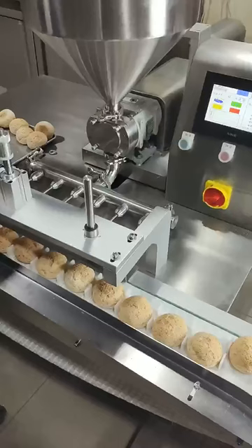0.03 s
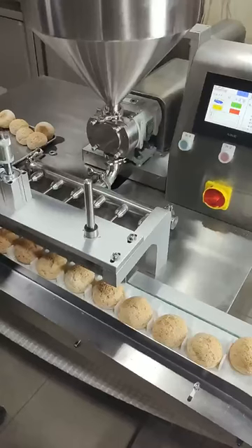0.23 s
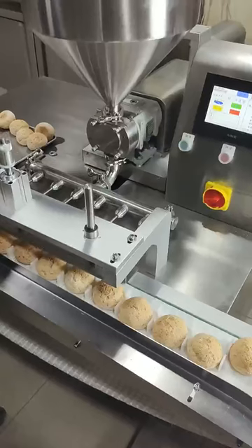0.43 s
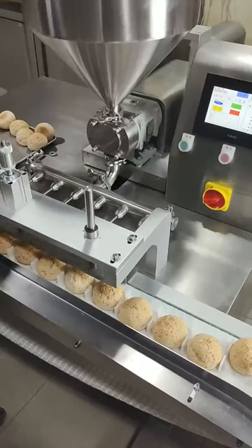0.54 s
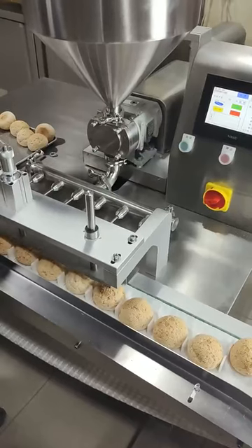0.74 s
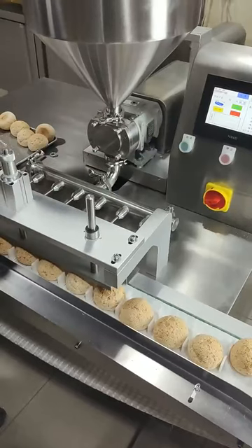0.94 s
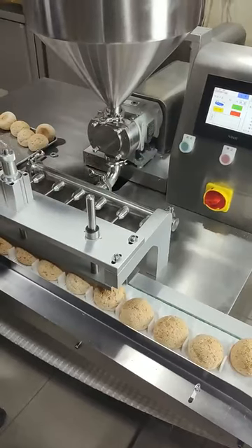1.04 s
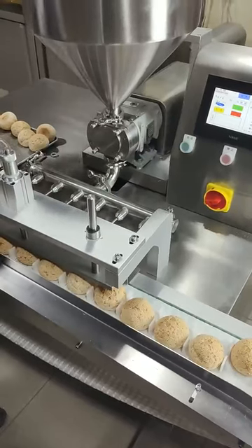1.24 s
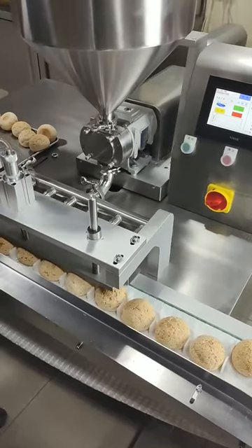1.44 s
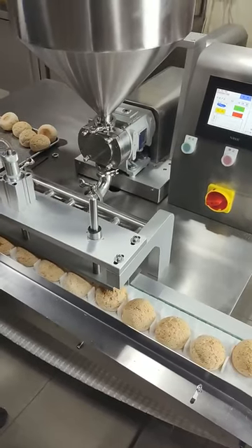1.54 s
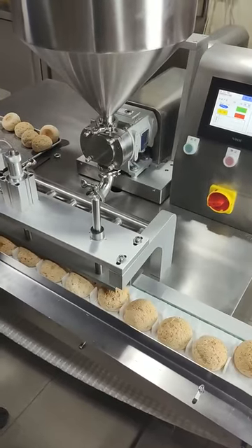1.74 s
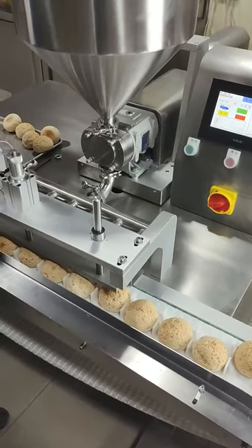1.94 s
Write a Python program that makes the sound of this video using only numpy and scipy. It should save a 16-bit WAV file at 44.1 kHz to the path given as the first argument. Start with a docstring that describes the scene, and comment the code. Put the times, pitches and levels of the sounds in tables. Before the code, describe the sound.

Close pneumatic filling machine in a hard-walled kitchen: a soft air puff and piston thump, a rattling steel clack, a lighter clack, then a heavy thump with a strong air blast fading out, over whine and hum.

```python
"""Pneumatic filling machine, close by

A filling machine runs one cycle in a hard-walled kitchen. A drive whines at one high pitch and the conveyor
motor hums in swells, both made from sine waves, over low machine noise made from filtered noise. Air vents in
shaped bursts of noise. A valve thumps open, and pistons thump into their cushions with a short low push and a
boom. Steel stops clack with ringing noise, the frame and loose parts rattle on, and the slide squeaks faintly."""
import sys
import numpy as np
from scipy import signal
from scipy.fft import rfft, irfft, next_fast_len
from scipy.io import wavfile
from scipy.ndimage import map_coordinates

SR = 44100
rng = np.random.default_rng(int(sys.argv[2]) if len(sys.argv) > 2 else 0)


def to_wav(sig):
    """Store sig (one row per channel, or 1-D mono) as 16-bit WAV at the path in sys.argv[1].

    Samples outside -1..1 are clipped; the rate is SR.
    """
    pcm = np.clip(np.atleast_2d(sig), -1, 1) * 32767
    pcm = np.round(pcm).astype(np.int16)
    wavfile.write(sys.argv[1], SR, pcm.T)  # frames by channels


N = 88200  # two seconds of samples

# Steel stops being hit. Each row: start in seconds, level in dB, time to fall by 60 dB in seconds,
# rattle level in dB, rattle hold in seconds, rattle release in dB per second, left minus right in dB.
CLACK_EVENTS = [(0.6492, -33, 0.049, -42.5, 0.078, 126, -1.5), (1.0402, -33, 0.027, -46, 0.029, 115, -4)]
# What each stop rings with, one list per stop. Each row: pitch in Hz, width in Hz, strength in dB.
STOP_RESONANCES = [
    [(610, 590, -3.5), (1176, 220, 7.5), (1290, 110, 11.5), (2500, 360, -16.5), (3170, 180, 2),
     (4570, 1900, -11.5), (6630, 980, -17), (9330, 860, -10)],
    [(1030, 660, -5), (2380, 470, 5.5), (4100, 150, -6), (4600, 300, -2), (5000, 130, -11),
     (6540, 220, 3.5), (9700, 1300, -22)],
]

BASS_HZ = 420  # below about this, bursts fade at their own speed and the ripple weakens


def amp(db):
    """Turn decibels into a gain."""
    return 10 ** (np.asarray(db) / 20)


def unit(x):
    """Scale x to an rms (average strength) of 1."""
    return x / np.sqrt(np.mean(x ** 2) + 1e-20)


def clock():
    """Time in seconds at each sample."""
    return np.arange(N) / SR


def curve(rows):
    """Join (seconds, value) points by straight lines, one value per sample."""
    return np.interp(clock(), *np.transpose(rows))


def along(points, hz):
    """Read a value at hz from (Hz, value) points joined on a logarithmic pitch axis."""
    point_hz, values = np.transpose(points)
    return np.interp(np.log(hz + 1), np.log(point_hz + 1), values)


def wobble(rate):
    """A smooth random curve with `rate` random points a second."""
    knots = rng.standard_normal(int(N * rate / SR) + 4)
    return map_coordinates(knots, [clock() * rate])


def panned(db):
    """Left and right gains for a level difference of left minus right."""
    left = np.atleast_1d(db)
    return amp(np.array([left, -left]) / 2)


def filtered(x, response):
    """Multiply the spectrum of x by a response that depends on frequency."""
    size = next_fast_len(N + SR // 4)  # spare room so that the end does not wrap onto the start
    hz = np.fft.rfftfreq(size, 1 / SR)
    return irfft(rfft(x, size) * response(hz), size)[..., :N]


def ringing(modes, hz):
    """Gain of a set of resonances: their powers add up, each peaking at its own pitch."""
    power = sum(amp(db) ** 2 / (1 + (2 * (hz - centre) / width) ** 2) ** 2 for centre, width, db in modes)
    return np.sqrt(power)


def ripple(hz):
    """Fine peaks and dips from standing waves between steel panels, different in each ear above the bass."""
    spacing_hz = 44.64
    knots = rng.standard_normal((2, SR // 16))
    peaks = np.array([map_coordinates(k, [hz / spacing_hz], mode="wrap") for k in knots])
    return peaks * hz / (hz + BASS_HZ)


def rush(gain, ripple_db=4.5):
    """Stereo noise of rms 1: bass alike in both ears, treble more diffuse and mostly to the right."""
    # Each row: frequency in Hz, likeness of left and right (1 is identical).
    likeness = [(80, 0.99), (180, 0.99), (350, 0.76), (700, 0.57), (1400, 0), (3000, 0.0052), (12000, 0.36)]
    # Each row: frequency in Hz, left minus right in dB.
    ear_balance = [(100, .3), (350, 0), (700, -1), (1400, 1), (2800, 0), (5600, -8.5), (9000, -0.5),
                   (13000, -14)]

    def middle_and_side(hz):
        angle = np.arccos(np.clip(along(likeness, hz), -1, 1)) / 2
        return gain(hz) * [np.cos(angle), np.sin(angle)]

    def ears(hz):
        return panned(along(ear_balance, hz)) * amp(ripple_db * ripple(hz))

    mid, side = filtered(rng.standard_normal((2, N)), middle_and_side)
    return unit(filtered(np.array([mid + side, mid - side]), ears))


def burst(noise, start, rise, hold, sag, dulling, release, lead=0):
    """Noise rises, changes level and tone, then fades; treble may stop sooner, bass has its own speed."""
    sag_pivot_hz, treble_hz = 1000, 6000  # dulling counts octaves from the first, lead from the second
    bass_release = 96  # dB per second
    rise_shape = 0.62  # below 1: a valve opens quickly at first
    hz, t, z = signal.stft(noise, SR, nperseg=512)
    hz = hz[:, None]
    age = np.maximum(t - start, 0)
    slope = sag + dulling * np.log2(np.maximum(hz, BASS_HZ) / sag_pivot_hz)
    fall = release + (bass_release - release) / (1 + (hz / BASS_HZ) ** 4)
    held = np.maximum(hold - lead * np.log2(1 + (hz / treble_hz) ** 4) / 4, 0)
    gain = amp(-slope * age - fall * np.maximum(age - held, 0))
    shaped = signal.istft(z * gain, nperseg=512)[1][:, :N]
    return shaped * np.clip((clock() - start) / rise, 0, 1) ** rise_shape


def strike(t, rise, t60):
    """Loudness of a blow at t = 0: a quick rise in seconds, while it falls 60 dB in t60 seconds."""
    return np.clip(t / rise, 0, 1) * amp(-60 * np.abs(t) / t60)


def machine_noise():
    """The frame's rumble swells and sinks over the noise of the kitchen, both as coloured noise."""
    # Tone of the frame and of the kitchen. Each row: frequency in Hz, strength in dB per Hz.
    rumble_colour = [(40, 7), (70, -4.5), (95, -5.5), (125, -8.5), (170, 4.5), (245, 2), (350, 0),
                     (480, -15.5), (1200, -97)]
    floor_colour = [(40, -52), (80, -2), (240, 5.5), (450, -9.5), (800, -16.5), (1500, -9.5), (2500, -15),
                    (4500, -12), (7500, -21), (11000, -42.5), (15500, -24)]
    # Loudness of each over time. Each row: time in seconds, level in dB.
    rumble_level = [(.2, -66), (.36, -60), (.5, -50.5), (.62, -64.5), (.7, -54), (.82, -54), (.98, -69.5),
                    (1.09, -60.5), (1.25, -53), (1.55, -48), (1.8, -65), (1.95, -82)]
    floor_level = [(.15, -73), (.5, -63.5), (.9, -61.5), (1, -62), (1.7, -64), (1.95, -68.5)]
    rumble = amp(curve(rumble_level)) * rush(lambda hz: amp(along(rumble_colour, hz)))
    kitchen = amp(curve(floor_level)) * rush(lambda hz: amp(along(floor_colour, hz)))
    return rumble + kitchen


def drives():
    """The drive's switching whine and the conveyor motor's hum: two sine waves that waver a little."""
    # Loudness of whine and hum. Each row: time in seconds, level in dB.
    whine_level = [(.15, -80), (.25, -60), (.42, -53.3), (.62, -53.8), (.8, -56.8), (1.03, -60.3),
                   (1.3, -62), (1.45, -68), (1.73, -69), (1.8, -79), (2, -86)]
    hum_level = [(.3, -85), (.38, -59), (.43, -94), (.5, -60), (.63, -64.5), (.76, -59), (.88, -57.5),
                 (.96, -80), (1.05, -68), (1.12, -109)]
    whine_hz, motor_hz = 9000, 86
    t = clock()
    whine = amp(curve(whine_level) + 1.2 * wobble(40.1)) * np.sin(2 * np.pi * whine_hz * t)
    hum_phase = 2 * np.pi * motor_hz * t + 0.1 * wobble(11)
    hum = amp(curve(hum_level) + 0.4 * wobble(17.6)) * np.sin(hum_phase)
    # The whine sits well to the right; the root of 2 brings a sine wave to rms 1.
    return np.sqrt(2) * (panned(-14) * whine + hum)


def exhausts():
    """Air rushes out and its tone shifts as it flows; the port's resonances fade a little more slowly."""
    # Each row: start in seconds, rise in seconds, hold in seconds, level in dB, sag in dB per second,
    # extra sag in dB per second per octave, release in dB per second, how much sooner treble stops
    # in seconds per octave. A negative sag grows louder.
    vents = [(0.155, 0.092, 0.22, -40.5, -8.5, 11.5, 122, 0.19),
             (1.139, 0.019, 0.21, -34.5, 20, 7, 48, 0.15), (1.197, 0.36, 0.55, -41, 18.5, -5, 175, 0.055)]
    # Tone of each exhaust's air. Each row: frequency in Hz, strength in dB per Hz.
    puff_colour = [(35, -53), (60, -17), (242, 5), (343, -2.5), (413, -10), (585, -3.5), (1320, -4.5),
                   (1420, -4.5), (2530, -6), (3840, -5.5), (7540, -8), (9300, 3.5), (10200, -7),
                   (11500, -25), (15500, -13.5)]
    blast_colour = [(35, -36), (60, -5), (149, -16), (179, -7), (215, -3), (413, -8), (572, -7.5),
                    (627, -5.5), (792, -5), (1230, -11.5), (2710, -8), (4850, -14.5), (9080, -10),
                    (11200, -17.5), (15500, -21.5)]
    bleed_colour = [(35, -48), (60, -11.5), (291, 0), (475, -7.5), (756, -3), (1170, -11), (1670, -3.5),
                    (2250, -8.5), (3760, -8), (4320, -9.5), (4740, -9), (5840, -11), (9300, -21),
                    (10900, -38.5), (15500, -32)]
    # Resonances of each exhaust port. Each row: pitch in Hz, width in Hz, strength in dB.
    puff_port = [(350, 25, 2), (580, 50, -2), (690, 40, 3), (760, 50, 2), (1430, 40, -1), (1590, 50, -2),
                 (1750, 35, 3), (2110, 40, -2), (2200, 40, 1), (2360, 50, -1), (2780, 60, 5), (2965, 50, 3),
                 (3130, 45, 0), (3460, 70, 4), (3650, 70, 1), (3935, 50, 2), (4330, 60, 2), (5200, 70, 0),
                 (7190, 70, -1), (8100, 150, -2)]
    blast_port = [(245, 25, -3), (560, 50, -1), (728, 25, 5), (805, 30, 0), (882, 30, 1), (1642, 70, 1),
                  (2762, 40, 1), (3182, 50, 2), (3905, 55, 5), (4390, 60, 2), (5540, 50, 1), (5890, 110, 4),
                  (6346, 40, 1), (6940, 70, 0), (9350, 120, -1), (10475, 70, 0)]
    bleed_port = [(245, 50, -1), (680, 60, -1), (1355, 60, -2), (1540, 50, -2), (1660, 100, 2),
                  (2440, 130, -3), (2865, 80, 3), (3360, 70, -2), (4280, 120, 0), (4440, 130, 3),
                  (5230, 60, -1), (5350, 50, -1), (5550, 100, 2), (5920, 50, 0), (6065, 50, 0),
                  (6340, 50, -2)]
    # One value per exhaust: level of the resonances over the rush in dB.
    port_levels = [-4.5, -6, -1.5]
    colours = (puff_colour, blast_colour, bleed_colour)
    ports = (puff_port, blast_port, bleed_port)
    out = 0
    for vent, colour, port, port_db in zip(vents, colours, ports, port_levels):
        start, rise, hold, db, sag, dulling, release, lead = vent
        air = rush(lambda hz: amp(along(colour, hz)))
        ring = rush(lambda hz: amp(along(colour, hz)) * ringing(port, hz), ripple_db=1.5)
        out = out + amp(db) * burst(air, start, rise, hold, sag, dulling, release, lead)
        out = out + amp(db + port_db) * burst(ring, start, rise, hold, sag, dulling, release * 0.8, lead)
    return out


def thumps():
    """A valve opens with a thump, then pistons meet their cushions: each a low push, and the room booms."""
    # Each row: time in seconds, level in dB, pitch of the push in Hz, its length (bell width) in seconds. # The
    # first row is the valve opening; the others are pistons meeting their cushions.
    thump_hits = [(.1605, -48.5, 250, .0018), (0.337, -29, 268, 0.00062), (0.3595, -44, 227, 0.00084),
                  (0.41, -59, 260, 0.0012), (.8278, -49, 170, 0.0018), (1.092, -42, 298, 0.0019),
                  (1.1533, -28.5, 146, 0.0025)]
    # Tone of the boom. Each row: frequency in Hz, strength in dB.
    boom_colour = [(40, -53), (70, -9), (95, 21), (160, 10.5), (280, 9), (500, 8.5), (1500, -66)]
    boom_db, boom_t60 = -16, 0.49  # relative to the push; seconds
    out = 0
    for start, db, hz, length in thump_hits:
        t = clock() - start
        push = np.sin(2 * np.pi * hz * t) * np.exp(-0.5 * (t / length) ** 2)
        boom = rush(lambda f: amp(along(boom_colour, f))) * strike(t, 0.0015, boom_t60)
        out = out + amp(db) * (push + amp(boom_db) * boom)
    return out


def clacks():
    """A steel stop rings briefly as resonant noise; frame and room rattle on after it."""
    # Tone of the rattle, one list per stop. Each row: frequency in Hz, strength in dB per Hz.
    rattle_colours = [[(35, -17), (60, -16), (178, -16), (209, -8.5), (309, -6.5), (504, -13.5),
                      (1240, -10.5), (1560, -18.5), (1720, -9.5), (2390, -5.5), (3460, -23.5), (4420, -21),
                      (8000, -35), (10400, -70), (17600, -120)][:-2] + [(9800, -30), (11500, -61),
                      (15500, -41)], [(35, -43), (60, -10), (302, -5), (582, -23), (859, -10), (1320, -21),
                      (1650, -10.5), (1760, -21), (2390, -8.5), (3060, -21.5), (3910, -14), (6520, -18.5),
                      (8000, -27), (10400, -53), (17600, -120)][:-2] + [(9800, -23), (11500, -41),
                      (15500, -40)]]
    rattle_rise, rattle_dulling = 0.027, 18  # seconds; dB per second per octave
    ring_gain = amp(-4.5)  # how much the stop's ringing colours the rattle
    out = 0
    for event, modes, colour in zip(CLACK_EVENTS, STOP_RESONANCES, rattle_colours):
        start, db, t60, rattle_db, hold, release, pan_db = event
        t = clock() - start
        crack = rush(lambda hz: ringing(modes, hz) + amp(-4.5) * amp(along(colour, hz)))
        crack = crack * strike(t, 0.0008, t60)
        rattle = rush(lambda hz: amp(along(colour, hz)) * (1 + ring_gain * ringing(modes, hz)))
        rattle = rattle * amp(1.1 * wobble(130))  # quick uneven loudness
        tail = burst(rattle, start, rattle_rise, hold, 0, rattle_dulling, release)
        out = out + amp(db) * panned(pan_db) * crack + amp(rattle_db) * tail
    return out


def taps():
    """Loose parts shaken by a clack strike the same stop again, more softly, exciting its resonances."""
    # Each row: time in seconds, level in dB.
    tap_hits = [(.682, -39), (0.7063, -42), (.728, -43), (0.758, -62), (1.061, -64), (1.088, -58)]
    second_clack = CLACK_EVENTS[1][0]
    out = 0
    for start, db in tap_hits:
        modes = STOP_RESONANCES[int(start > second_clack)]
        knock = rush(lambda hz: ringing(modes, hz)) * strike(clock() - start, 0.00085, 0.015)
        out = out + amp(db) * knock
    return out


def squeaks():
    """Faint thin squeaks of the slide: unsteady sine waves that swell and fade."""
    # Each row: start in seconds, length in seconds, pitch in Hz, peak level in dB.
    slide_squeaks = [(0.94, 0.063, 4140, -67.5), (1, 0.07, 5050, -68)]
    t = clock()
    out = 0
    for start, length, hz, db in slide_squeaks:
        swell = np.sin(np.pi * np.clip((t - start) / length, 0, 1))
        tone = np.sin(2 * np.pi * hz * t + 0.36 * wobble(220))
        out = out + amp(db) * swell * tone
    return out


def scene():
    """All parts of the machine together."""
    return machine_noise() + drives() + exhausts() + thumps() + clacks() + taps() + squeaks()


def record(dry):
    """The microphone opens after a moment, cuts deep bass and keeps nothing above its band limit."""
    start, fade = 0.1405, 0.01  # seconds
    low_cut_hz, top_hz = 74, 15800
    low_cut = signal.butter(8, low_cut_hz, "highpass", fs=SR, output="sos")
    thin = filtered(dry, lambda hz: np.abs(signal.sosfreqz(low_cut, hz, fs=SR)[1]))
    opened = thin * np.clip((clock() - start) / fade, 0, 1)
    return filtered(opened, lambda hz: hz < top_hz)


dry = scene()
out = record(dry)
to_wav(out)
```